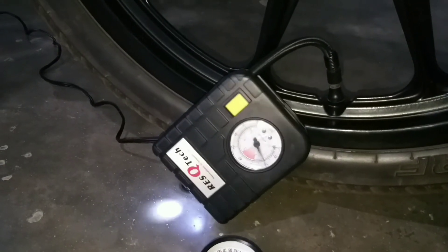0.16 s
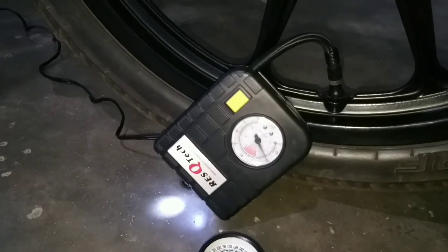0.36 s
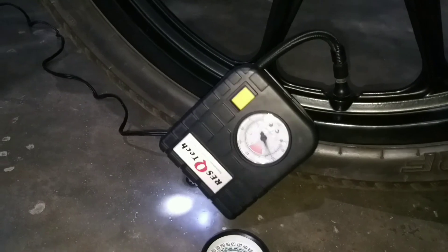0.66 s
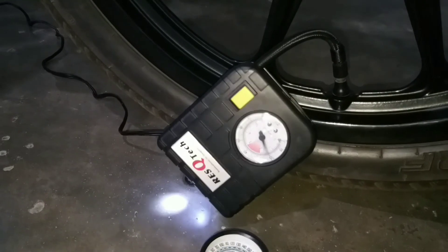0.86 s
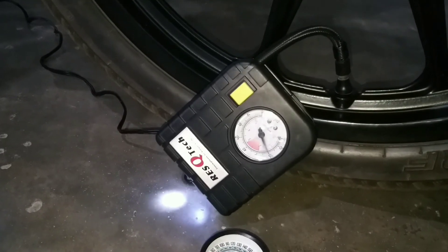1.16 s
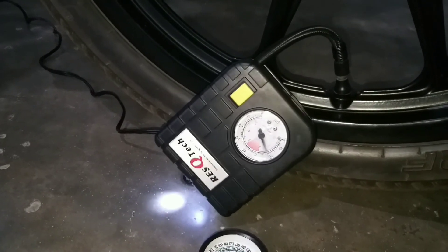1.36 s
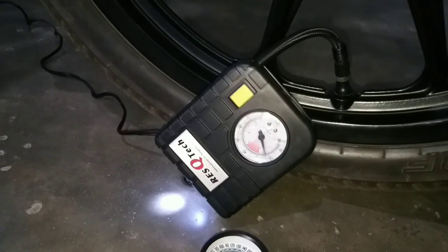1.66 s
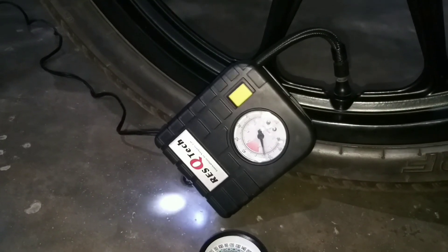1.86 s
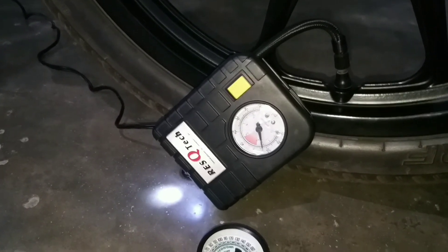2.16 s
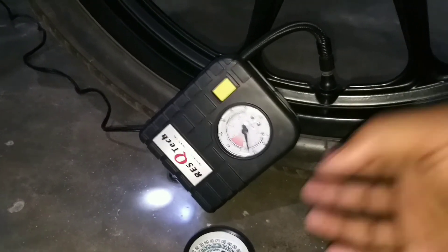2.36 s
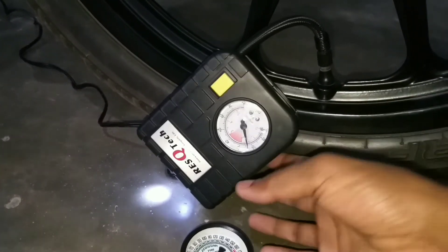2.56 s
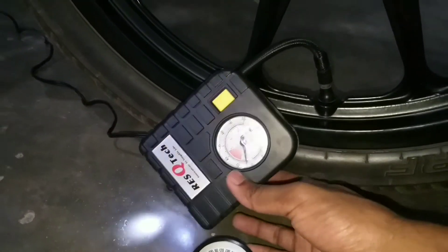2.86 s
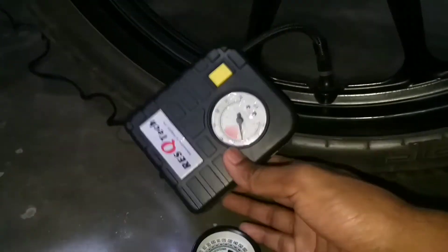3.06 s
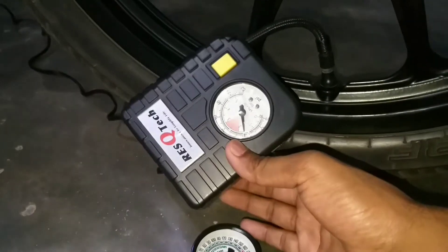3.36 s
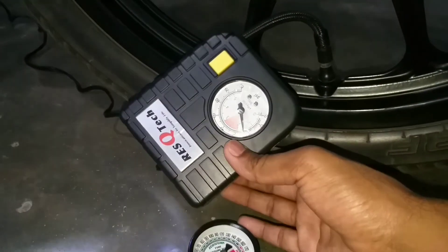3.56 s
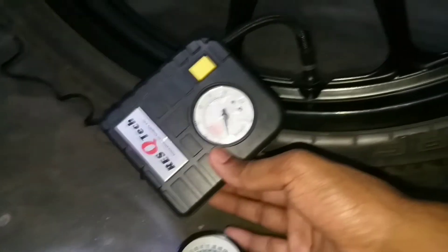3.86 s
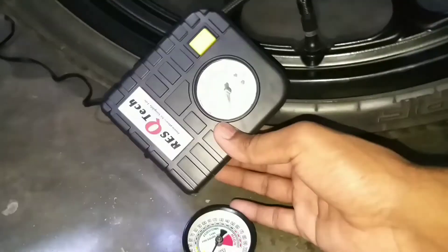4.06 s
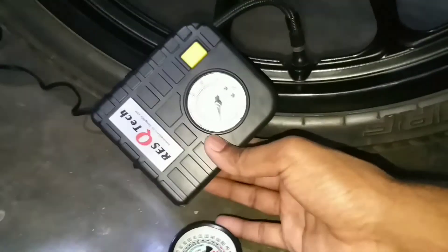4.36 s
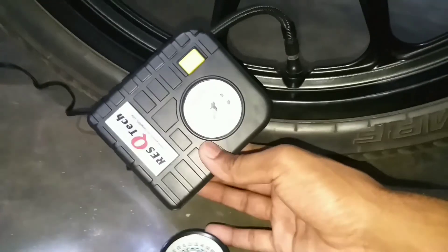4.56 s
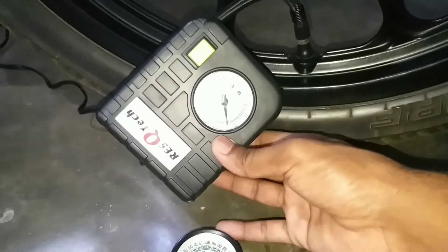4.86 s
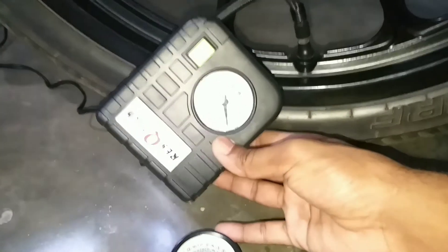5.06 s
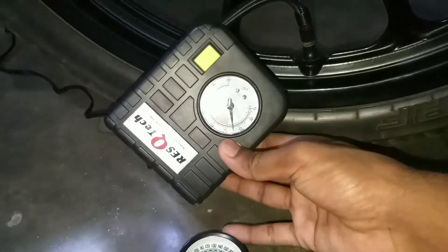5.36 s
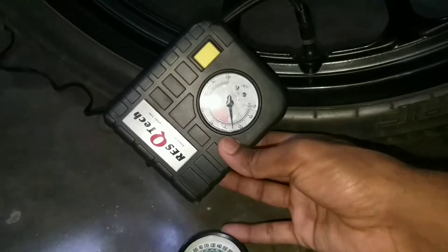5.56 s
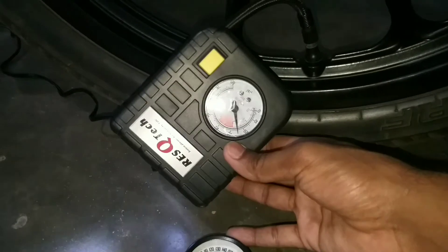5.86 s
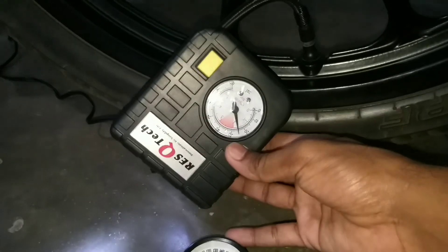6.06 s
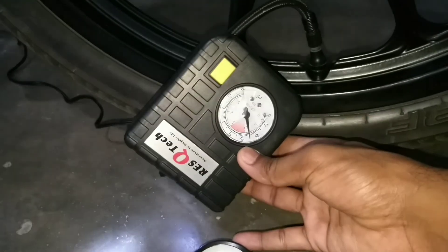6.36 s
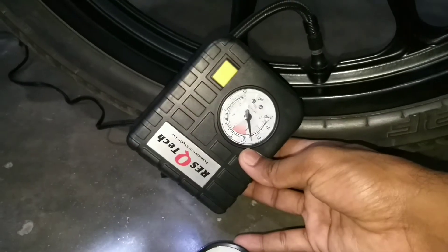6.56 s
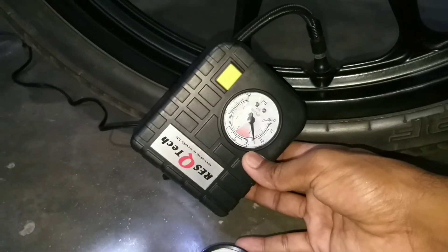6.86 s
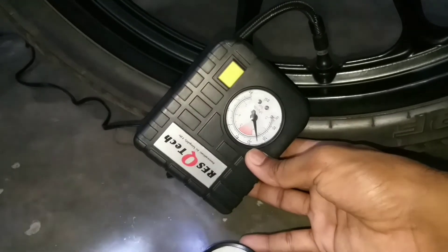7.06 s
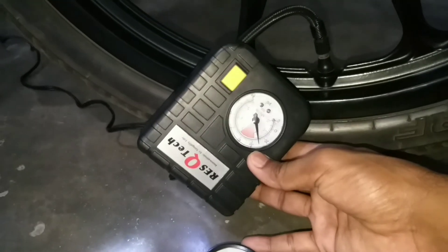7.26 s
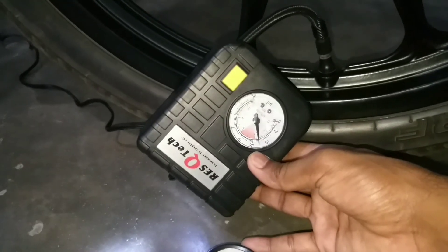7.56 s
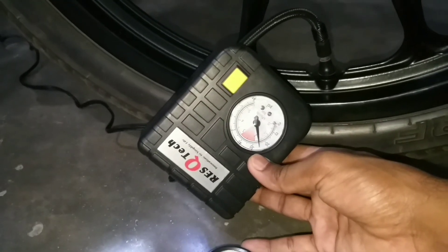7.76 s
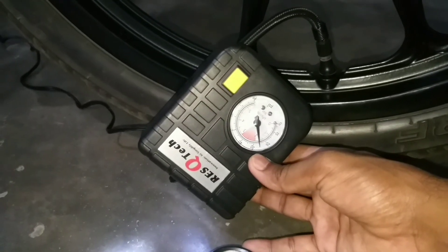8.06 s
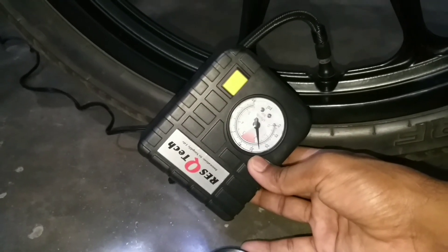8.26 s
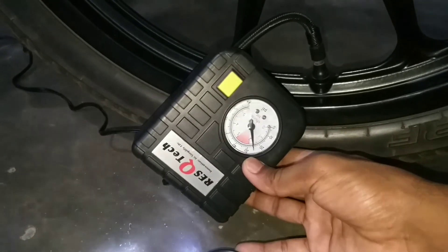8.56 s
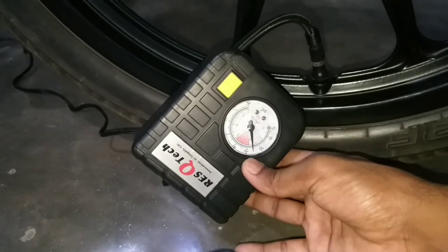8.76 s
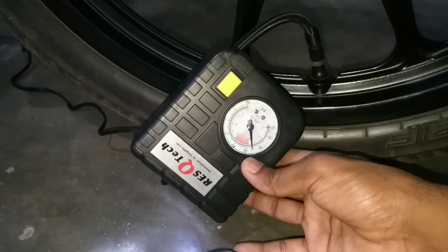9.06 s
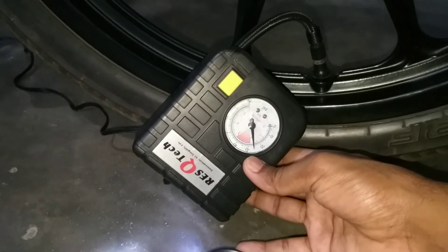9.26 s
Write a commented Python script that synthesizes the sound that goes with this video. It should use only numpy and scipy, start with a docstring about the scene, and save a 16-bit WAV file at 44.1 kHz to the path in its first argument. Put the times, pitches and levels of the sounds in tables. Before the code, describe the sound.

A small electric tyre inflator runs from the first instant to about 9.4 seconds, close and dry on a concrete floor, nearly mono. Its piston knocks about sixty times a second, fusing into a rough, nasal plastic buzz; gritty gear noise and hissing valve air pulse with every stroke. Bass is slight, just weak motor hum and faint rumble. The speed sags almost imperceptibly, then levels off. The rasp dips briefly around 0.4 and just before 2.3 seconds. At 2.3 and 2.4 two tiny bright scuffs sound as a hand grips the case, and the rasp softens. At 2.9 the case tilts up with a thin, high squeal lasting a quarter second, and its buzz turns more hollow and ringing. From 4.2 it is moved outward, slightly louder near 4.8, its colour gliding until about 7, then holding steady, still running at the end.

```python
"""A small electric tyre inflator buzzes on a concrete floor, its piston making about sixty strokes a second.
From the start, each stroke knocks in the plastic case, gears and valve air rasp in time with the crank,
the motor hums over a faint rumble, and the rasp twice dips briefly. At 2.3 s a hand grips the case with two
scuffs; at 2.9 s it tilts the case up with a thin squeal; from 4.2 s it moves it out to be held, passing
nearest at 4.8 s. Impulses and noise excite chains of resonators, which change with the pose of the case."""
import sys
import numpy as np
from scipy import signal
from scipy.io import wavfile

SR = 44100
rng = np.random.default_rng(int(sys.argv[2]) if len(sys.argv) > 2 else 0)


def generate_wav(sig):
    """Save sig (samples, or channels by samples) to the path in sys.argv[1] as 16-bit PCM at SR."""
    pcm = np.round(np.clip(np.atleast_2d(sig).T, -1, 1) * 32767).astype(np.int16)
    wavfile.write(sys.argv[1], SR, pcm)


N = 414981
TIME = np.arange(N) / SR  # s


def from_db(db):
    """Logarithmic levels: 20 dB is a tenfold amplitude."""
    return 10 ** (np.asarray(db) / 20)


def rms(x):
    """Effective value: the root of the mean power."""
    return np.sqrt(np.mean(x ** 2) + 1e-20)


def butter(x, kind, hz, order=2):
    """Causal Butterworth filter, maximally flat in its passband."""
    sos = signal.butter(order, np.clip(hz, 10, .45 * SR), kind, fs=SR, output="sos")
    return signal.sosfilt(sos, x + 1e-18)


def noise(low_hz, high_hz, order=2):
    """Band-limited Gaussian noise, scaled to an effective value of 1."""
    x = butter(rng.standard_normal(N), "band", [low_hz, high_hz], order=order)
    return x / rms(x)


def drift(rate_hz):
    """Slow random wandering: straight lines between Gaussian values of spread 1."""
    knots = rng.standard_normal(400)
    return np.interp(TIME * rate_hz, np.arange(len(knots)), knots)


def swell(s, length):
    """A Gaussian envelope of height 1, fallen to 1/e one length (s) either side of its moment."""
    return np.exp(-((TIME - s) / length) ** 2)


def resonate(x, peaks):
    """Second-order resonances and cancellations in series, whose gains in dB add."""
    for hz, width_hz, db in peaks:
        root_gain = from_db(db / 2)
        width = np.tan(np.pi * min(width_hz, SR / 4) / SR)
        middle = -2 * np.cos(2 * np.pi * hz / SR)
        zeros = [1 + width * root_gain, middle, 1 - width * root_gain]
        poles = [1 + width / root_gain, middle, 1 - width / root_gain]
        x = signal.lfilter(zeros, poles, x)
    return x


def disperse(x, hz, width_hz):
    """All-pass dispersion: waves near one pitch linger in the plastic, which smears a sharp blow."""
    radius = np.exp(-np.pi * width_hz / SR)
    poles = [1, -2 * radius * np.cos(2 * np.pi * hz / SR), radius * radius]
    return signal.lfilter(poles[::-1], poles, x)


def crank_turns():
    """Rotation as the integral of speed: the turns made by the crank up to each sample."""
    # crank speed, slowing as the tyre fills, then levelling off: t/s, speed/(turns per minute)
    crank_speed = [(0, 3668.6), (1.7, 3633.8), (6.2, 3587.1), (9.41, 3582)]
    start_turns = .118
    rpm = np.interp(TIME, *np.transpose(crank_speed))
    turns = start_turns + np.cumsum(rpm) / (60 * SR)
    return turns + .005 * drift(rate_hz=7)  # the motor never runs quite evenly


def pose():
    """Decelerating motion: 0 on the floor, 1 gripped, 2 tilted up, 3 held out; each move eases to rest."""
    # the hand grips the case, tilts it up, then holds it out: start t/s, duration/s
    moves = [(2.306, .12), (2.883, 0.38), (4.2, 2.86)]
    now = 0
    for start_s, length_s in moves:
        remaining = 1 - np.clip((TIME - start_s) / length_s, 0, 1)
        now = now + 1 - remaining ** 2
    return now


def loudness():
    """Gains in dB add: the pose sets the levels of knock and rasp, nearness and brief dips shift them."""
    # base levels on the floor, gripped, tilted up and held out, before nearness and dips:
    # knock level in 450-1000 Hz/dB, rasp level in 4-14 kHz/dB
    pose_levels = [(-47.8, -47.5), (-49, -50.5), (-46, -48), (-46, -48)]
    # the rasp dips briefly: t/s, gain/dB, length of swell/s
    rasp_dips = [(0.403, -2, 0.17), (2.263, -2.5, 0.053)]
    # the case passes nearest to the listener while raised: t/s, gain/dB, length of swell/s
    nearest = [(4.8, 1.3, 0.58)]
    now = pose()
    knock_db, rasp_db = (np.interp(now, np.arange(len(db)), db) for db in np.transpose(pose_levels))
    near_db = sum(db * swell(s, length) for s, db, length in nearest)
    dip_db = sum(db * swell(s, length) for s, db, length in rasp_dips)
    return knock_db + near_db, rasp_db + near_db + dip_db


def radiate(x, poses, band_hz):
    """Radiation through pose-dependent resonances: each pose has level 1 in the band, and they cross-fade."""
    now, out = pose(), 0
    for k, peaks in enumerate(poses):
        rung = resonate(x, peaks)
        nearness_to_pose = np.maximum(1 - abs(now - k), 0)
        out = out + nearness_to_pose * rung / rms(butter(rung, "band", band_hz))
    return out


def knock(turns, jitter_s, uneven_db):
    """Impulse excitation: each contact of each turn, a little uneven in time and force, rings the case."""
    # piston reversal, its rebound and the return stroke: share of a turn, level/dB
    contacts = [(.008, 5.5), (0.107, -4), (0.484, -12)]
    # resonances and cancellations that no pose changes: f/Hz, width/Hz, gain/dB
    case_low = [(358, 27, -2), (423, 20, 3)]
    # resonances and cancellations of the case under the knock, in each pose: f/Hz, width/Hz, gain/dB
    on_floor = [(480, 28, -4.5), (711, 30, -11.5), (763, 410, 13.5), (900, 155, -4.5), (1086, 36, 5),
                (1220, 240, -12.5), (1416, 104, 6), (1623, 940, 17.5), (2210, 650, -9.5), (2804, 61, 10),
                (3093, 49, 9.5)]
    gripped = [(682, 156, 13.5), (727, 43, -18), (820, 230, 12), (920, 75, -11), (1070, 240, 3),
               (1200, 65, 0), (1390, 29, 7.5), (1710, 210, 12), (3320, 190, 11)]
    tilted = [(464, 24, -16), (684, 83, 15), (708, 27.7, -14), (812, 84, 18), (1018, 42, 8),
              (1180, 17, -19), (1255, 32, 24), (1406, 400, -14), (1455, 490, -15.5), (1564, 44, 30),
              (1940, 250, 16.5), (2830, 89, -7), (3249, 540, 20)]
    held = [(462.5, 41, -11.5), (655, 136, 8), (819.4, 63.5, 22), (1011, 35, 18.5), (1066, 270, -9),
            (1310, 23, -22), (1550, 80, -19.5), (1648, 150, 13.5), (1892, 120, 7), (2150, 72, -15),
            (2610, 71, 14.5), (3210, 83, 0), (3940, 95, 13), (5450, 1070, 22)]
    strokes, clicks = np.arange(int(turns[-1]) + 1), np.zeros(N)
    for share, db in contacts:
        late, force = rng.standard_normal((2, len(strokes)))
        contact_s = np.interp(strokes + share, turns, TIME, left=-1, right=-1) + jitter_s * late
        at = contact_s * SR
        inside = (at > 0) & (at < N - 1)
        np.add.at(clicks, at[inside].astype(int), from_db(db + uneven_db * force)[inside])
    blow = butter(clicks, "high", 540, order=3)  # the small case radiates little bass
    blow = butter(butter(blow, "low", 750, order=1), "low", 3920)  # plastic contacts are soft
    blow = disperse(disperse(blow, hz=2080, width_hz=1800), hz=3210, width_hz=550)
    blow = disperse(disperse(blow, hz=5040, width_hz=620), hz=7300, width_hz=4100)
    blow = resonate(blow, case_low)
    return radiate(blow, [on_floor, gripped, tilted, held], band_hz=[450, 1000])


def crank_pulsing(turns, uneven_db):
    """Periodic amplitude modulation by the load on gears and valve; no two turns are equally strong."""
    # rasp over one turn, loud at the discharge, swelling again at the intake: share of a turn, level/dB
    rasp_cycle = [(0.01, 3.5), (.06, -2), (.16, 4.5), (.27, -1), (.5, 2), (.62, 3), (.75, 5.5), (.9, 5.5)]
    share, db = np.transpose(rasp_cycle)
    strokes = np.arange(int(turns[-1]) + 2)
    chance = np.interp(turns, strokes, rng.standard_normal(len(strokes)))
    return from_db(np.interp(turns, share, db, period=1) + uneven_db * chance)


def tooth_pattern(turns, count=60, size=735):
    """Cyclic roughness: the same teeth meet on every turn; the pattern of size points shifts over count turns."""
    stage, blend = np.divmod(turns / count, 1)
    stage, tooth = stage.astype(int), (turns % 1 * size).astype(int)
    roughness = rng.standard_normal((stage[-1] + 2, size))
    # square-root weights keep the power even through the cross-fade
    return np.sqrt(1 - blend) * roughness[stage, tooth] + np.sqrt(blend) * roughness[stage + 1, tooth]


def rasp(turns, pulsing, grit_db, teeth_db):
    """Friction and turbulence noise: repeating gear teeth and gritty valve air escape through the vents."""
    # resonances and cancellations of the vents and gear train, in each pose: f/Hz, width/Hz, gain/dB
    on_floor = [(338, 380, -9.5), (1835, 150, 5.5), (2330, 960, -5.5), (4250, 180, -11), (5036, 124, 11),
                (7770, 980, 5), (10740, 4900, -12.5), (12150, 830, 17), (14800, 1500, 12.5),
                (15100, 4700, -14.5)]
    gripped = [(467.0, 3900, -3.5), (646, 330, 7), (1830, 210, 8), (3350, 410, 5.5), (5060, 220, 12.5),
               (10000, 1629.0, -6.5)]
    tilted = [(362, 250, -5), (780, 140, 7), (1240, 170, -7), (3030, 470, 3.5), (3490, 330, 5.5),
              (4270, 720, -3.5), (4880, 390, 6), (5050, 320, 3.5), (5540, 280, 9), (7500, 460, 6.5),
              (8430, 480, 4.5), (9250, 310, 5), (10500, 2300, -5), (12030, 340, 12.5)]
    held = [(322, 260, -14), (830, 210, 0.5), (1495, 440, -6.5), (2180, 70, -11.5), (3630, 210, -1),
            (4370, 940, -6.5), (4800, 160, 4.5), (5160, 210, 10), (5300, 146, -3), (5810, 190, 6.5),
            (6900, 250, -4), (7650, 330, 3), (7970, 150, 8.5), (9300, 260, 6.5), (10020, 280, 10),
            (10290, 2800, -12), (12010, 330, 8.5), (13000, 870, -8)]
    teeth = from_db(teeth_db) * butter(tooth_pattern(turns), "band", [1000, 6000], order=1)
    air = rng.standard_normal(N) * from_db(grit_db * noise(40, 730))
    grit = (teeth + air) * pulsing
    grit = butter(butter(grit, "high", 560), "low", 5570, order=1)
    return radiate(grit, [on_floor, gripped, tilted, held], band_hz=[4000, 14000])


def hum(turns):
    """Harmonic forcing: the unbalanced crank shakes at whole multiples of its speed."""
    # orders one to four of the crank: rms level/dB
    order_levels = [-92, -75.5, -126.5, -73]
    total = 0
    for order, db in enumerate(order_levels, 1):
        total = total + np.sqrt(2) * from_db(db) * np.sin(2 * np.pi * order * turns)
    return total


def rumble():
    """Broadband low-frequency noise, steady and faint."""
    return from_db(-83.5) * noise(47, 240, order=1)


def scuff():
    """Sliding friction: short noise bursts as the gripped case scuffs the floor."""
    # scuffs: t/s, level/dB, length of swell/s
    floor_scuffs = [(2.305, -52, .014), (2.386, -48, .009)]
    envelope = sum(from_db(db) * swell(s, length) for s, db, length in floor_scuffs)
    return envelope * noise(3000, 14000, order=1)


def squeal(pulsing):
    """Narrow-band noise, amplitude-modulated by the crank: a brief thin squeal as the case is lifted."""
    start_s, attack_s, hold_s, release_s = 2.9, .03, .14, .07
    corners_s = start_s + np.cumsum([0, attack_s, hold_s, release_s])
    envelope = np.interp(TIME, corners_s, [0, 1, 1, 0])
    chirps = butter(rng.standard_normal(N) * pulsing ** 4, "band", [7980, 8220], order=2)
    return from_db(-55) * envelope * chirps / rms(chirps)


def stereo(mono):
    """Nearly mono: two narrow bands, 1.3-2.2 and 8.5-10.3 kHz, differ faintly between the channels."""
    middle_side = from_db(-19.0) * butter(mono, "band", [1300, 2200], order=3)
    high_side = from_db(-20.0) * butter(np.gradient(mono), "band", [8500, 10300], order=4)
    return np.array([mono + middle_side - high_side, mono - middle_side + high_side])


def scene():
    """Superposition: the inflator, its handling and a faint rumble, all nearly mono."""
    turns = crank_turns()
    knock_db, rasp_db = loudness()
    pulsing = crank_pulsing(turns, uneven_db=.5)
    pump = from_db(knock_db) * knock(turns, jitter_s=.000015, uneven_db=0.28)
    pump = pump + from_db(rasp_db) * rasp(turns, pulsing, grit_db=1.6, teeth_db=0.5)
    mono = pump + hum(turns) + rumble() + scuff() + squeal(pulsing)
    return stereo(mono)


def record(dry):
    """Elliptic low-pass filtering cuts the top steeply."""
    cutoff_hz, ripple_db, rejection_db = 15600, .1, 80
    return signal.sosfilt(signal.ellip(12, ripple_db, rejection_db, cutoff_hz, fs=SR, output="sos"), dry)


dry = scene()
out = record(dry)
generate_wav(out)
```